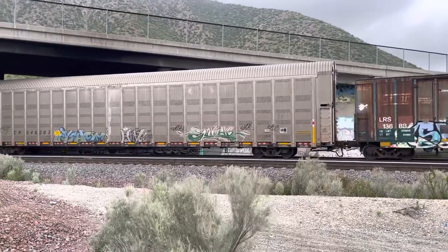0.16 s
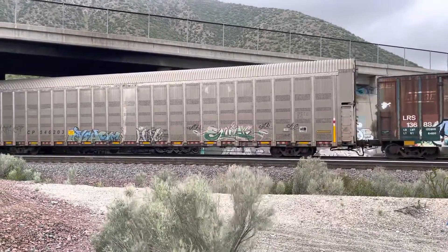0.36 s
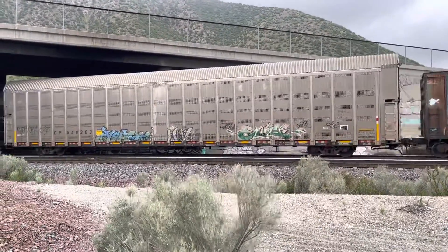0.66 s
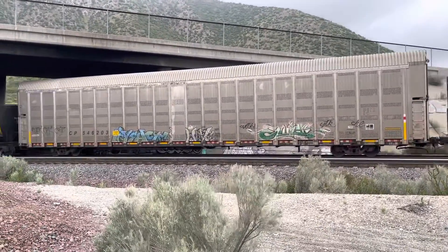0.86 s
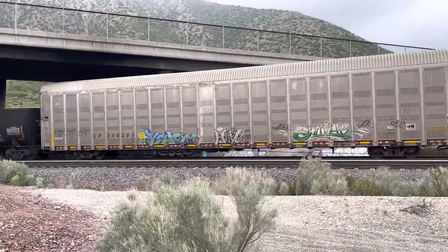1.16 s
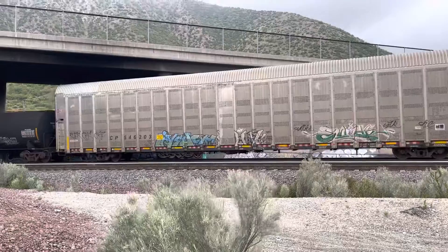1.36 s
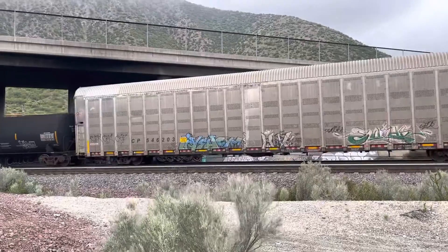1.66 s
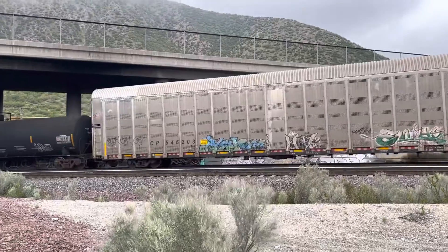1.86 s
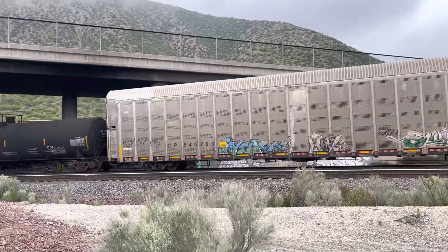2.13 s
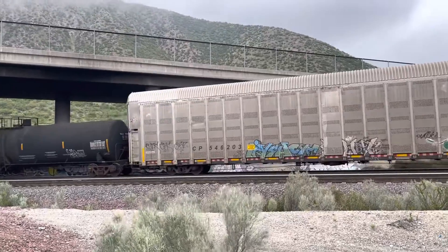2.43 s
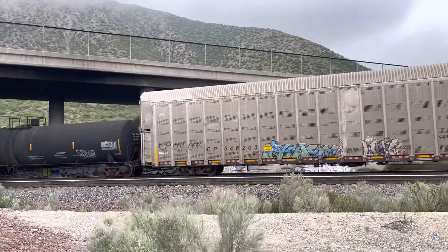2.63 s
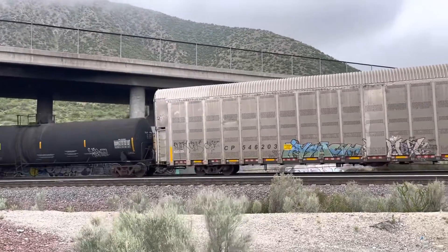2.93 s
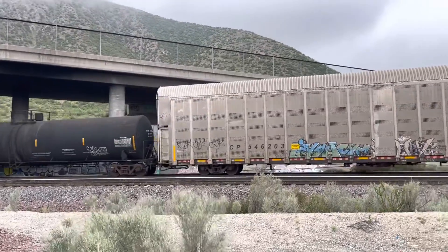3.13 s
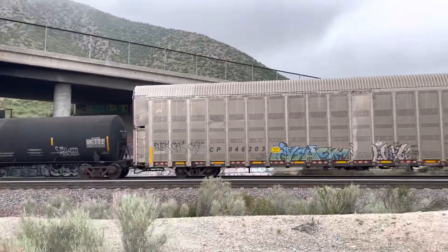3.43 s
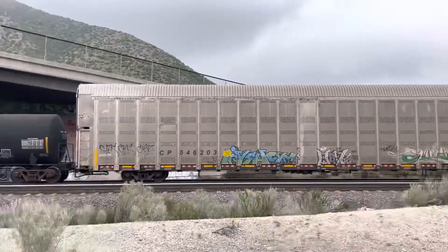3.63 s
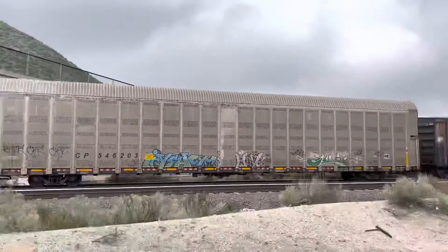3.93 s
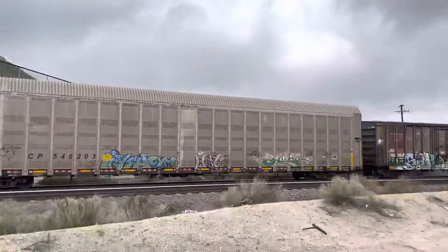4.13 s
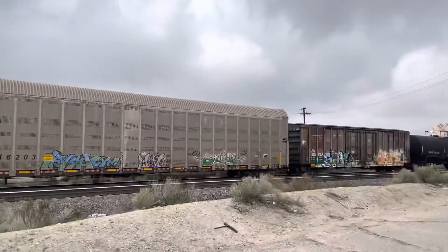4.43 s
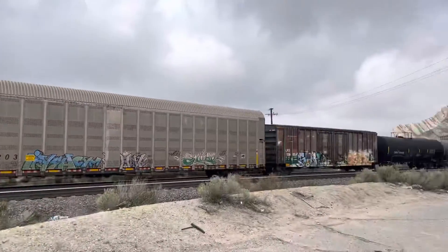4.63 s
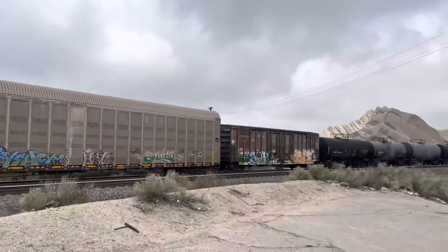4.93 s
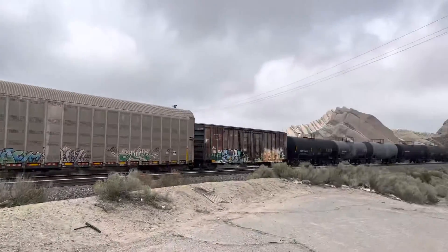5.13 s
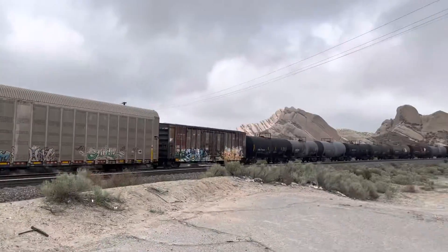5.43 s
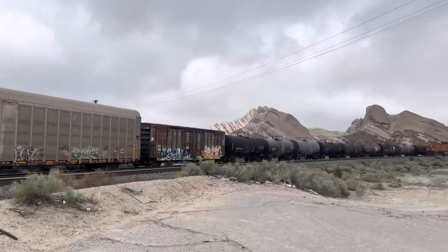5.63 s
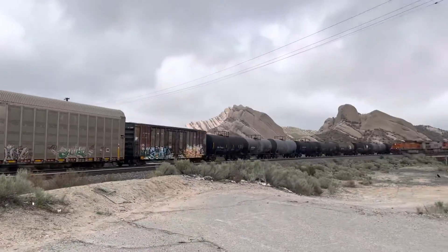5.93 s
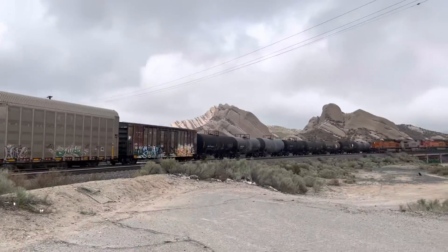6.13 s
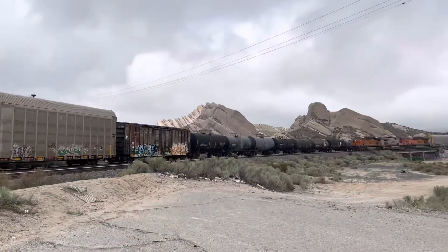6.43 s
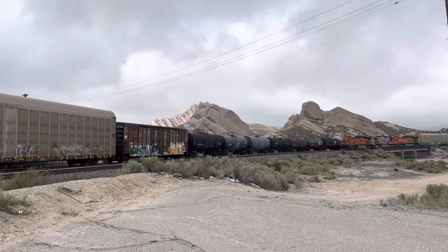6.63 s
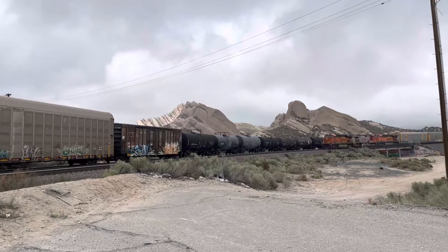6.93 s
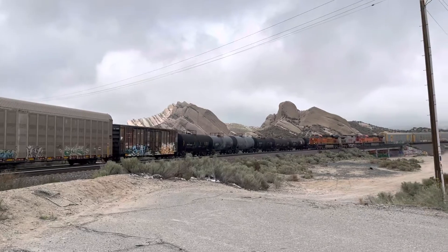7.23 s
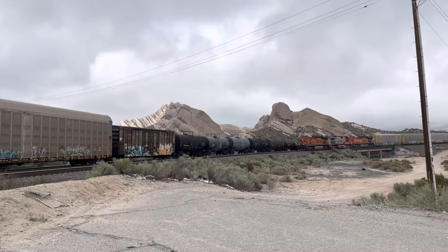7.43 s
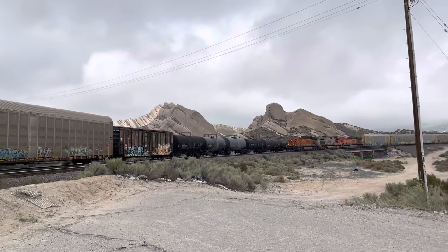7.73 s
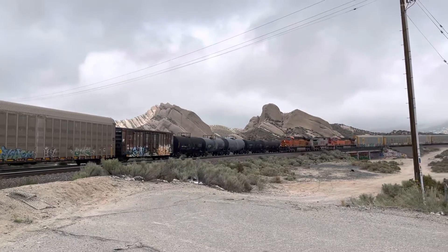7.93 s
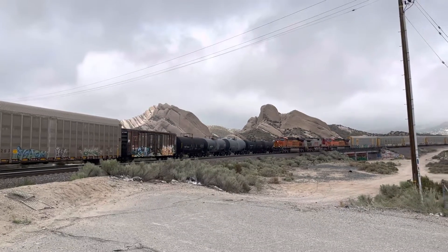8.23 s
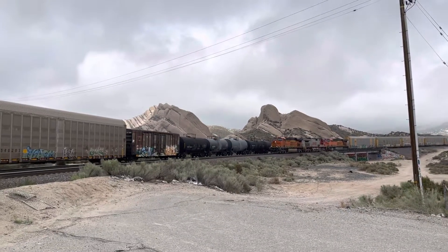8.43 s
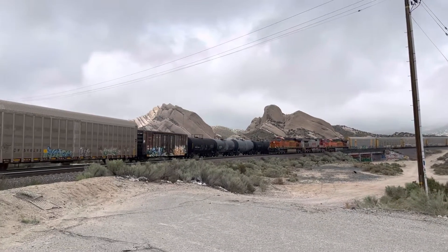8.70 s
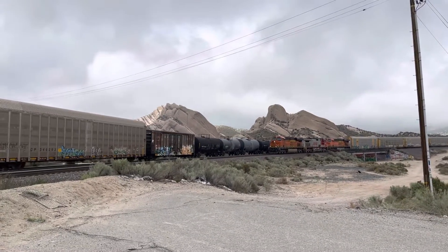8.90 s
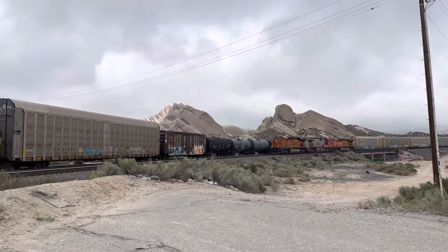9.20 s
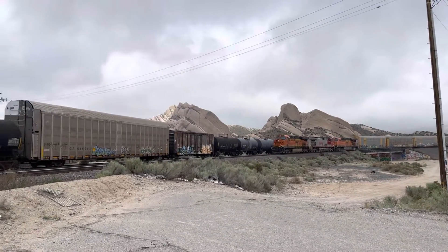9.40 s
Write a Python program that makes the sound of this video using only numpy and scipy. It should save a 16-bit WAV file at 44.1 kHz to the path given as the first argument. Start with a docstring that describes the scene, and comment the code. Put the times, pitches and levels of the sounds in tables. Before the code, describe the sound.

Outdoors beside railway tracks, heavy cars roll by with low boom and roar while steel wheels screech a wavering, echoing high-pitched squeal throughout.

```python
"""Open ground beside a railway curve, where a freight train rolls slowly by with a rumble and a roar,
made of shaped noise. Wheels stick and slip and squeal in single modes: pure tones ringed by
Doppler-shifted echoes off the moving cars. Flanges hiss as noise, ring in rim modes and whistle.
Knocks are noise thuds with decaying sines, dry ticks are noise bursts, and rubs and squeaks
are narrow noise at a gliding pitch."""
import sys
import numpy as np
from scipy import signal
from scipy.fft import rfft, irfft, next_fast_len
from scipy.io import wavfile
from scipy.ndimage import uniform_filter1d, map_coordinates

SR = 44100
rng = np.random.default_rng(int(sys.argv[2]) if len(sys.argv) > 2 else 0)


def generate_wav(signal):
    """Clip the signal to [-1, 1] and save it as 16-bit WAV at the path in sys.argv[1]."""
    frames = np.transpose(np.atleast_2d(signal))
    scaled = np.clip(frames, -1, 1) * 32767
    pcm = np.round(scaled).astype(np.int16)
    wavfile.write(sys.argv[1], SR, pcm)


N = 421596


def amp(db):
    """A level in decibels is 20 times the logarithm of the amplitude ratio returned here."""
    return 10 ** (np.asarray(db) / 20)


def unit(x):
    """Normalisation: the mean power becomes 1, so a later gain alone sets the level."""
    return x / np.sqrt(np.mean(np.abs(x) ** 2) + 1e-20)


def clock():
    """Sampling: the time of each sample in seconds."""
    return np.arange(N) / SR


def along(points, hz):
    """Logarithmic frequency scale: (Hz, value) points are joined by straight lines on it."""
    f, v = np.transpose(points)
    return np.interp(np.log(hz + 1), np.log(f + 1), v)


def curves(rows):
    """Linear interpolation: one value per sample for each column after the time."""
    s, *cols = np.transpose(rows)
    return [np.interp(clock(), s, c) for c in cols]


def passage(rows):
    """Envelope: gain from (s, dB) rows, falling at 150 dB a second outside their span."""
    t = clock()
    outside = np.maximum(0, np.maximum(rows[0][0] - t, t - rows[-1][0]))
    return amp(curves(rows)[0] - 150 * outside)


def humps(rows):
    """Cosine-squared window: a smooth hump for each (centre s, reach s to either side, height) row."""
    t, out = clock(), np.zeros(N)
    for s, reach, height in rows:
        near = slice(*np.searchsorted(t, [s - reach, s + reach]))
        out[near] += height * np.cos(np.pi / 2 * (t[near] - s) / reach) ** 2
    return out


def swells(rows):
    """Envelope: gain of (centre s, reach s, peak dB) events that swell and fade."""
    return humps([(s, reach, amp(db)) for s, reach, db in rows])


def wobble(rate):
    """Slow random modulation: a smooth curve through random knots, rate of them a second."""
    coarse = np.linspace(0, N, N // 32)
    knots = rng.standard_normal(int(N * rate / SR) + 4)
    smooth = map_coordinates(knots, [coarse * rate / SR])
    return np.interp(np.arange(N), coarse, smooth)


def filtered(x, response):
    """Linear filtering: the spectrum is multiplied by a complex response of frequency."""
    size = next_fast_len(N + 8192)
    return irfft(rfft(x, size) * response(np.fft.rfftfreq(size, 1 / SR)), size)[..., :N]


def rush(colour):
    """Coloured noise of rms 1: a shared and an opposed part set the coherence of the two ports."""
    # Likeness of the two microphone ports. Each row: frequency in Hz, likeness from 0 to 1.
    likeness = [(35, 0.99), (60, 0.99), (130, 0.92), (280, 0.81), (590, 0.39), (1300, 0.042), (2600, 0.66),
                (5200, 0.54), (7500, 0.64), (8600, 1), (12000, 1)]
    size = next_fast_len(N + 8192)
    hz = np.fft.rfftfreq(size, 1 / SR)
    # a gentle extra rolloff continues past the last point of the spectrum
    gain = amp(along(colour, hz)) / (1 + (hz / (2 * colour[-1][0])) ** 2)
    alike = np.clip(along(likeness, hz), -1, 1)
    white = rng.standard_normal((2, 2 * len(hz)), dtype=np.float32).view(np.complex64)
    shares = (gain * np.sqrt([1 + alike, 1 - alike])).astype(np.float32)
    mid, side = irfft(white * shares, size)[:, :N] * size
    return unit(np.array([mid + side, mid - side]))


def steady(x):
    """Level compression: dividing by the quarter-second rms leaves only the quick throb."""
    power = np.abs(uniform_filter1d(np.mean(x ** 2, axis=0), size=SR // 4))
    return unit(x / np.sqrt(power + 1e-3))


def facing(across, down_line):
    """Directional colour: equal-power mixing as the listener turns to a grazing angle."""
    # The listener turns to look down the line. Each row: time in seconds, turn from 0 to 1.
    turning = [(0, 0), (3.3, 0.03), (4.5, 0.62), (6, 0.97), (9.56, 1)]
    turn = np.clip(curves(turning)[0], 0, 1)
    return np.sqrt(1 - turn) * rush(across) + np.sqrt(turn) * rush(down_line)


def scatter(width_hz, drop_hz, steep, apart):
    """Doppler spreading: many echoes, each with its own shift, make a complex fading at both ports."""
    step = 16  # samples between computed points
    count = next_fast_len(N // step + 2)
    shift = np.fft.fftfreq(count, step / SR)
    shape = 1 / np.sqrt(1 + np.abs((shift + drop_hz) / width_hz) ** steep)
    lines = rng.standard_normal((2, count)) + 1j * rng.standard_normal((2, count))
    mid, side = np.fft.ifft(lines * shape)
    slow = unit(np.array([mid + apart * side, mid - apart * side])).astype(np.complex64)
    ramp = np.arange(step, dtype=np.float32) / step
    return (slow[:, :-1, None] + np.diff(slow)[..., None] * ramp).reshape(2, -1)[:, :N]


def spin(pitch):
    """Phase is the integral of frequency: a unit phasor that follows a pitch in Hz."""
    phase = (2 * np.pi * (np.cumsum(pitch * np.ones(N)) / SR % 1)).astype(np.float32)
    return np.cos(phase) + 1j * np.sin(phase)


def panned(x, db):
    """Interaural level difference: the left is made louder than the right by db."""
    return x * amp(np.array([db, -db]) / 2).reshape(2, -1)


def rolling():
    """Roughness excitation: heavy cars boom on springs, their sides drum, and rails roar and hiss."""
    # Boom as heavy cars come near. Each row: time in seconds, relative level in dB.
    boom_level = [(0, -37), (.23, -38), (.275, -32), (.33, -41), (.71, -39), (.755, -24.5), (3.8, -22.5),
                  (8.4, -20.5), (8.55, -25), (9.56, -23)]
    # A car lurches louder or settles softer. Each row: centre in seconds, change in dB.
    lurches = [(1.42, 5), (1.79, -4), (1.98, 8.5), (2.33, -4), (2.591, 5), (3.07, -3.5), (3.85, 3),
               (5.5, 4.5), (6.09, 3), (6.3, -2), (6.5, -7), (6.68, 4.5), (7.3, 2), (7.52, 3), (7.66, -3.5),
               (8.03, 5), (8.58, -8), (8.73, 3), (8.92, -8), (9.08, 2)]
    lurch_reach_s = 0.088
    # Car sides drumming near 100 Hz. Each row: time in seconds, relative level in dB.
    drum_level = [(0.0, -44), (0.24, -32), (0.48, -40), (0.92, -32), (3.08, -22.5), (3.32, -37),
                  (4.16, -25.5), (4.4, -38), (5.48, -23), (6.6, -34), (7.08, -25), (7.6, -33), (8.2, -28),
                  (8.5, -37), (9.08, -43), (9.56, -31)]
    # Rolling noise. Each row: time in seconds, then relative levels in dB of car bodies, rails and hiss.
    roll = [(0.0, -42, -41, -50.5), (0.24, -37, -40, -48), (0.64, -37.5, -38.5, -49.5),
            (1.04, -29.5, -37.5, -49.5), (2.52, -30.5, -38, -48), (3.32, -28.5, -35.5, -46.5),
            (4.32, -29, -37.5, -49), (5.24, -29.5, -37, -49.5), (5.6, -29.5, -39, -49),
            (5.92, -29.5, -39, -51.5), (8.12, -29.0, -37.5, -51.0), (8.48, -32.5, -43, -58),
            (9.56, -31.5, -37.5, -54)]
    # Spectra, some across the track and some down the line. Each row: frequency in Hz, density in dB per Hz.
    rumble_colour = [(15, -45), (30, -25), (45, -14), (58, 0.5), (70, -5.5), (85, -9), (105, -18.5),
                     (160, -44)]
    drum_colour = [(70, -39), (90, -5), (99, 8.5), (110, -5), (130, -23), (170, -35)]
    body_colour = [(70, -41), (120, -0.5), (170, -0.5), (260, -2), (310, -4), (390, -7), (460, -10.5),
                   (600, -21), (1200, -48)]
    body_far_colour = [(70, -17), (120, 2), (160, -1), (230, -4), (300, -9.5), (345, -5), (430, -17),
                       (600, -28), (1200, -45.5)]
    rail_colour = [(200, -11), (450, 3), (620, 1.5), (800, 4.5), (1000, 2.5), (1350, -1.5), (2200, -5.5),
                   (2900, -10.5), (4500, -22)]
    rail_far_colour = [(200, -11), (450, 0), (620, 1.5), (780, -1.5), (920, -4.5), (1030, 0), (1250, -1.5),
                       (1420, -4), (2200, -5.5), (2900, -15), (4500, -60)]
    hiss_colour = [(2000, -13), (3200, 7.5), (4700, 5), (5300, 7), (6000, 3), (7200, 0), (8600, 1.5),
                   (9700, 1.5), (11000, 5), (13000, -71)]

    body_db, rail_db, hiss_db = curves(roll)
    lurch_db = humps([(s, lurch_reach_s, db) for s, db in lurches])
    boom_gain = passage(boom_level) * amp(0.4 + lurch_db + 0.68 * wobble(14))
    boom = boom_gain * steady(rush(rumble_colour))
    drum = passage(drum_level) * amp(-2.0) * steady(rush(drum_colour))
    body = amp(body_db + 0.6 + 0.56 * wobble(12)) * facing(body_colour, body_far_colour)
    # down the line the bounce off the ground hollows the roar below 1 kHz
    rails = amp(rail_db + 2.0 + 0.89 * wobble(14)) * facing(rail_colour, rail_far_colour)
    hiss = amp(hiss_db + 3.0 + 1.56 * wobble(70)) * rush(hiss_colour)
    return boom + drum + panned(body, db=0.5) + panned(rails, db=2.0) + panned(hiss, db=2.5)


def wheel_squeal():
    """Stick-slip locks one wheel mode into a pure tone; echoes flutter it, hard slip adds overtones."""
    # How hard the main wheel squeals. Each row: time in seconds, effort in dB.
    effort = [(0.0, -38), (0.36, -35), (0.6, -48), (0.88, -33.5), (1.04, -46), (2.6, -29), (2.76, -34),
              (3.28, -24.5), (4.72, -33.5), (5.24, -24.5), (5.48, -33.5), (6.48, -30.5), (7.12, -24),
              (7.52, -29.5), (8.24, -23.5), (8.64, -22.5), (8.76, -30), (9.56, -24.5)]
    usual_db = -30  # effort at which the relative levels below hold
    # Its pitch sinks as it rolls away. Each row: time in seconds, pitch in Hz.
    wheel_pitch = [(0, 2659), (.2, 2652), (.38, 2661), (.9, 2659), (1.62, 2648), (1.88, 2659), (2.1, 2653),
                   (3, 2664), (5.3, 2662), (6, 2656), (7.05, 2658), (7.25, 2652), (7.45, 2656), (7.7, 2641),
                   (8.1, 2650), (8.3, 2650), (8.9, 2640), (9.15, 2644), (9.33, 2633), (9.56, 2629)]
    # The wheel bites and its pure tone surges. Each row: centre in seconds, extra level in dB.
    surges = [(.33, 4.5), (1.47, 6.5), (1.75, 4), (1.88, 10), (2.1, 0.5), (2.19, 4.5), (2.57, 2), (2.91, 6),
              (3.02, 6), (3.3, 3.5), (3.46, 2.5), (3.79, 3), (3.92, 8), (4.31, 5.5), (4.89, 8), (5.16, 3),
              (5.3, 2), (5.7, 5), (5.95, 7.5), (6.38, 2.5), (6.83, 2.5), (7.12, 4.5), (7.27, 3),
              (7.82, 4.5), (7.95, 5), (8.15, 6), (8.31, 7), (8.6, 3.5), (8.89, 7.5), (9.13, 4), (9.35, 5),
              (9.48, 6)]
    # The wheel grips and the squeal falters.
    # Each row: centre in seconds, reach in seconds, depth in dB (negative lifts).
    grips = [(.125, 0.049, 13), (.93, 0.048, 8), (1.05, 0.041, 9), (1.35, .035, 7), (1.81, 0.076, 6),
             (1.96, 0.077, 12), (2.245, .025, 18), (2.39, 0.037, 7), (2.965, 0.023, 13), (3.255, 0.031, 10),
             (3.51, 0.018, 18), (3.66, .03, 9), (3.745, 0.014, 5), (3.955, 0.018, 15), (4.22, 0.014, 7),
             (4.38, .016, 10), (4.51, 0.016, 15), (4.6, 0.013, -4), (4.655, 0.014, 15), (4.76, 0.037, 12),
             (4.853, 0.014, 18), (5.415, 0.0099, 6), (5.57, .04, 15), (5.805, 0.015, 18),
             (5.865, 0.041, 11), (6.13, 0.036, 30), (6.325, 0.035, 10), (6.49, 0.054, 4),
             (6.678, 0.019, 16), (7.34, 0.055, 9), (7.535, 0.019, 12), (7.61, 0.0097, 22),
             (7.768, 0.023, 13), (7.9, 0.059, 5.5), (7.988, 0.0092, 13), (8.19, 0.015, 17),
             (8.41, 0.037, 6.5), (8.725, 0.018, 12), (9.045, 0.011, 18), (9.225, 0.056, 6.5),
             (9.298, 0.027, 21), (9.43, 0.01, 12), (9.518, 0.014, 21)]
    surge_reach_s, grip_echo_share = 0.064, 0.42  # the share of a grip's depth that dips the echoes
    # relative levels in dB, and the dB each gains for each dB of effort
    direct_db, direct_grows = -25.5, 1.06
    partner_db, partner_grows = -35.5, 0.26
    overtone_db, overtone_grows = -63, 0.14
    lock_grows = 1  # dB of flutter lost for each dB of squeal
    # The partner wheel sags and drifts back. Each row: time in seconds, Hz below the main wheel.
    partner_sag = [(0, 16), (.25, 25), (.42, 52), (.6, 30), (.9, 20), (1.12, 42), (1.33, 18), (1.5, 22),
                   (2.4, 32), (4.5, 42), (6.5, 25), (9.56, 20)]
    # Echoes off the cars, strongest as a tall flat-sided one passes.
    # Each row: time in seconds, relative level in dB.
    echo_level = [(0, -37.5), (.4, -33.5), (1.05, -38.5), (2.7, -32), (3.55, -28), (4.7, -28), (5.5, -31.5),
                  (6.3, -34.5), (6.8, -30.5), (8.15, -28.5), (8.5, -37), (8.8, -32), (9.56, -29.5)]
    # Second harmonic, which the fourth follows. Each row: time in seconds, relative level in dB.
    even_overtones = [(0, -61), (2.3, -55), (2.65, -48), (2.95, -52), (3.35, -47.5), (4.1, -55),
                      (4.75, -48), (5.05, -56), (5.55, -53), (6.05, -66), (6.45, -54), (7.5, -56),
                      (8.25, -51), (8.5, -56.5), (8.75, -55.5), (9.56, -52.5)]
    fourth_db = -3  # relative to the second
    # Doppler spread in Hz of the second, third and fourth harmonic.
    overtone_spread_hz = [135, 80, 110]
    # The wheel slips hard and turns shrill.
    # Each row: centre in seconds, reach in seconds, relative overtone level in dB.
    shrills = [(4.75, 0.27, -61), (6.75, 0.32, -72), (8.15, 0.18, -62), (9.15, 0.21, -52), (9.5, 0.13, -50)]
    # The squeal shifts between the ports as wheel and listener move.
    # Each row: time in seconds, left over right in dB, extra phase lead of left in radians.
    bearing = [(0, 1, -0.29), (.9, 3, -.15), (1.3, 5.5, -0.51), (2.6, 6, -0.8), (3.3, 2, -0.49),
               (4, 1, 0.42), (5.1, -3, 0.37), (5.75, 2.5, -0.54), (6.2, -1.5, -0.2), (7.8, -1, 0.059),
               (8.5, -2, 0.44), (9.56, 0.5, 0.85)]

    effort_db = curves(effort)[0] - usual_db
    surge_db = humps([(s, surge_reach_s, db) for s, db in surges])
    grip_db = humps(grips)
    # the harder the wheel squeals, the firmer it locks and the less its tone flutters
    loose = np.minimum(amp(-lock_grows * (effort_db + surge_db)), 1.3)
    tone = spin(curves(wheel_pitch)[0] + (1.3 + 3.0 * loose) * wobble(14))
    fading = 1 + 0.17 * scatter(width_hz=35, drop_hz=1.4, steep=6.2, apart=0.5)
    flutter = amp(1.57 * loose * wobble(24)) * fading
    direct = amp(direct_db + direct_grows * effort_db + surge_db - grip_db) * flutter

    # the other wheel on the axle sings a little lower and beats with it
    partner_gain = amp(partner_db + partner_grows * effort_db - grip_db + 0.69 * wobble(4.5))
    partner = partner_gain * spin(5 * wobble(7) - curves(partner_sag)[0])

    # most echoes come off receding cars and lie below the pitch; the train's speed bounds their spread
    echo = passage(echo_level) * amp(2.5 - grip_echo_share * grip_db)
    near = scatter(width_hz=41.6, drop_hz=26.4, steep=5.1, apart=0.47)
    wide = 0.54 * scatter(width_hz=99, drop_hz=0, steep=13, apart=0.5)
    left_db, lead = curves(bearing)
    port_phase = np.exp(.5j * np.array([lead, -lead], dtype=np.float32))
    voice = (direct + partner + echo * (near + wide)) * tone * port_phase

    # harder slip distorts the wheel's swing into harmonics, heard as a haze of echoes
    odd_gain = amp(overtone_db + overtone_grows * effort_db - usual_db + 3.3 * wobble(7))
    odd = odd_gain * echo + swells(shrills)
    even = passage(even_overtones) * amp(1.2 * wobble(9) - grip_echo_share * grip_db)
    levels = [even, amp(2.0) * odd, amp(fourth_db) * even]
    for order, (level, width_hz) in enumerate(zip(levels, overtone_spread_hz), 2):
        haze = scatter(width_hz=width_hz, drop_hz=13 * order, steep=4, apart=0.37)
        voice = voice + level * tone ** order * haze
    return panned(voice.real, left_db)


def flanges():
    """Friction-driven resonance: grinding flanges hiss, and rim modes ring harder with the grind."""
    # Flanges grind and recede. Each row: time in seconds, relative level in dB.
    grind_level = [(0, -45.5), (.9, -41.5), (1.2, -37), (2.2, -43), (3, -46.5), (3.8, -46.5), (4.4, -66),
                   (9.56, -71)]
    # Single scrapes. Each row: centre in seconds, reach in seconds, relative level in dB.
    scrapes = [(4.0, 0.21, -44), (4.32, 0.14, -47), (4.76, 0.19, -49.5), (5.21, 0.21, -45.5),
               (6.7, 1.0, -66), (9.4, 0.38, -71)]
    # Rim modes. Each row: frequency in Hz, relative level in dB.
    rim = [(6670, -64), (7634, -59), (8080, -61), (8672, -56), (8720, -60), (9119, -60), (10826, -56),
           (11122, -53), (11676, -59), (11714, -56)]
    # Grinding spectrum. Each row: frequency in Hz, density in dB per Hz.
    flange_colour = [(5000, -15), (7400, -10), (7800, -2.5), (8700, -5.5), (9500, 4), (10300, 9.5),
                     (11200, 4), (11700, -1), (12200, -2), (12550, -16), (12800, -12), (13000, -32)]
    usual_db, rim_db, rim_grows = -42, -47, 1.2  # rim level at the usual grind, and dB gained per dB

    grind_db, = curves(grind_level)
    grind_gain = (amp(grind_db) + swells(scrapes)) * amp(2.5 + 2.0 * wobble(25.12))
    grind = grind_gain * rush(flange_colour)
    # each rim mode is caught and let go on its own, and echoes blur them all
    modes = sum(amp(db) * np.abs(1 + 0.53 * wobble(12)) * spin(hz + 11 * wobble(30)).real
                for hz, db in rim)
    blur = 1 + 0.5 * scatter(width_hz=55, drop_hz=0, steep=2.7, apart=.4).real
    return grind + amp(rim_db + rim_grows * (grind_db - usual_db)) * unit(modes) * blur


def whistles():
    """Direct and scattered sound: a near flange sends tone, echoes and a neighbour mode; far ones echoes."""
    # A near flange whistles very high. Each row: time in seconds, relative level in dB.
    near_level = [(0.0, -38), (0.12, -34), (0.97, -40), (1.21, -34), (1.45, -40.5), (3.26, -45),
                  (4.03, -55), (4.15, -73)]
    # Flanges farther off. Each row: centre in seconds, reach in seconds, relative level in dB.
    far_level = [(6.9, 1.2, -60.5), (9.33, 0.33, -53)]
    near_hz, start_hz, neighbour_hz, far_hz = 12308, 12385, 12446, 12490
    settle_s = 0.35  # time constant of the fall from start_hz

    pitch = near_hz + (start_hz - near_hz) * np.exp(-clock() / settle_s)
    direct = 0.49 * amp(2.9 * wobble(20.96))
    echoes = 0.41 * scatter(width_hz=22, drop_hz=-6, steep=2.5, apart=0.24)
    tone = spin(pitch) * (direct + echoes)
    neighbour = .38 * spin(neighbour_hz) * scatter(width_hz=10, drop_hz=0, steep=2.4, apart=.5)
    near = passage(near_level) * amp(7.5 + 1.1 * wobble(7.1)) * (tone + neighbour)
    far = swells(far_level) * spin(far_hz) * scatter(width_hz=35, drop_hz=0, steep=3, apart=0.46)
    return np.real(near + far)


def rubs():
    """Resonance bandwidth: rubbing steel squeaks or groans in narrow gliding bands and rasps in wide ones."""
    # Brief rubs. Each row: centre in seconds, reach in seconds, pitch in Hz, glide in Hz per second,
    # width in Hz, relative level in dB.
    rub_rows = [(0.301, 0.62, 1920, 0, 150, -49.5), (.7, 1.3, 1032, 0, 118.8, -48.5),
                (1.56, 0.14, 6035, 0, 18, -54), (1.8, .8, 2513, -2, 35, -50),
                (3.31, .07, 2200, -400, 25, -46), (4.17, 0.038, 2130, 0, 22, -44),
                (4.673, 0.04, 2120, 500, 25, -43), (4.76, .13, 2160, 0, 194.4, -47),
                (4.735, 0.07, 642, 0, 140, -39.5), (4.785, .09, 903, 800, 260, -41.5),
                (5.075, .12, 1460, 200, 55, -40), (5.16, .32, 1547, -100, 130, -42),
                (5.265, .07, 1580, -300, 56, -41), (5.305, .1, 1390, -800, 240.7, -39),
                (5.12, 0.29, 882, 0, 150, -45), (6.866, 0.045, 2140, -500, 28, -44),
                (7.3, 1.7, 1025, 0, 30, -50), (9.297, .55, 1422, -2, 270, -46.5)]
    t, out = clock(), np.zeros((2, N))
    for s, reach, hz, glide, width_hz, db in rub_rows:
        near = np.abs(t - s) < reach
        age = t[near] - s
        lowpass = signal.butter(2, width_hz, fs=SR, output="sos")
        white = rng.standard_normal((2, 2 * len(age))).view(complex)
        mid, side = signal.sosfilt(lowpass, white)
        carrier = np.exp(2j * np.pi * (hz + glide * age / 2) * age)
        rasp = np.array([mid + .6 * side, mid - 0.43 * side]) * carrier
        out[:, near] += amp(db + 4.5) * unit(rasp.real) * np.cos(np.pi / 2 * age / reach) ** 2
    return out


def hits(rows, colour, t60, attack):
    """Heavily damped impact: noise bursts that fall 60 dB in t60 seconds."""
    t, envelope = np.arange(SR // 4) / SR, np.zeros(N + SR)
    for s, db in rows:
        envelope[round(s * SR):][:len(t)] += amp(db - 60 * t / t60) * (1 - np.exp(-t / attack))
    return envelope[:N] * rush(colour)


def knocks():
    """Impulse response: slack runs in, and each blow gives a dull thud and a short ring of the struck part."""
    # Couplers and running gear clunk.
    # Each row: start in seconds, relative thud level in dB, ring pitch in Hz, ring level in dB.
    blows = [(0.152, -25, 110, -25), (0.204, -25, 278, -22.5), (0.242, -20, 290, -25),
             (0.261, -18, 161, -21), (0.28, -25, 125, -16), (0.406, -24, 400, -22.5),
             (0.462, -27, 340, -29), (0.479, -20, 330, -21), (0.512, -24, 190, -24), (4.735, -28, 600, -25),
             (4.782, -28, 750, -20.5)]
    # Thud spectrum. Each row: frequency in Hz, density in dB per Hz.
    knock_colour = [(50, -27), (130, 1), (380, -4), (700, -18), (2000, -27), (5000, -52)]
    ring_s = 0.061  # time to fall 60 dB
    t, rings = np.arange(SR // 4) / SR, np.zeros(N + SR)
    for s, _, hz, db in blows:
        decay = amp(db - 60 * t / ring_s) * (1 - np.exp(-t / .002))
        rings[round(s * SR):][:len(t)] += decay * np.sin(2 * np.pi * hz * t)
    thuds = hits([row[:2] for row in blows], knock_colour, t60=0.073, attack=0.003)
    return rings[:N] + amp(-2.5) * thuds


def ticks():
    """Short steel contacts excite high bands: a clink and a brighter snap, with fine crackle between."""
    # Dry ticks. Each row: start in seconds, relative clink level in dB, relative snap level in dB.
    contacts = [(1.107, -46, -33), (1.4217, -43, -36), (3.0076, -43, -37), (3.1094, -45, -37),
                (3.2056, -42, -33.5), (3.7998, -43, -36.5), (4.2023, -44, -37), (4.6084, -39, -39),
                (4.9062, -42, -41), (5.256, -38, -48), (5.3073, -43, -35.5), (5.46, -40, -44),
                (5.5094, -41, -40), (5.5583, -35, -50), (5.6087, -45, -41), (5.657, -37, -41),
                (5.7014, -39, -38.5), (5.7344, -43, -43), (5.8194, -45, -43), (5.9399, -49, -44),
                (6.2103, -43, -36), (6.3026, -40, -41), (6.5071, -50, -42), (6.5325, -39, -34),
                (6.6114, -43, -40), (7.01, -48, -40), (7.1097, -40, -44), (7.33, -48, -42),
                (7.7184, -46, -39.5), (7.8077, -47, -38.5), (8.0356, -51, -41.5)]
    # Snap, clink and crackle spectra. Each row: frequency in Hz, density in dB per Hz.
    snap_colour = [(3000, -25), (5500, -7), (6800, 5), (8700, 7), (10000, 8.5), (12500, -25)]
    clink_colour = [(2500, -25), (4000, -4), (5000, 5), (5700, -1), (7500, -15), (10000, -35)]
    crackle_colour = [(2500, -20), (4500, -2), (9000, 1), (12000, -26)]
    crackle_s, crackle_spread_s, crackle_db, crackle_count = 5.6, 0.23, -43.5, 26

    s, clink_db, snap_db = np.transpose(contacts)
    clinks = hits(zip(s, clink_db), clink_colour, t60=0.062, attack=0.0025)
    snaps = hits(zip(s, snap_db), snap_colour, t60=0.058, attack=0.0011)
    when, size = rng.standard_normal((crackle_count, 2)).T
    starts = np.clip(crackle_s + crackle_spread_s * when, 0, N / SR)
    grains = zip(starts, crackle_db + 2.5 * size)
    return amp(1) * (clinks + snaps) + hits(grains, crackle_colour, t60=0.017, attack=0.0004)


def axle_squeal():
    """Beating: two nearly equal wheels take turns to sing, and interfere among their echoes."""
    # A second axle squeals higher.
    # Each row: time in seconds, then relative levels in dB of lower wheel, higher wheel and echoes.
    axle = [(1.359, -60, -59, -64), (1.48, -58, -50.5, -55), (2.1, -53, -52, -50), (2.4, -45, -45, -48),
            (2.74, -53, -54, -38.5), (2.81, -43, -34, -39), (2.89, -38, -36, -38), (2.96, -33, -44, -38),
            (3.05, -51, -53, -40), (3.13, -46, -48, -36), (3.22, -32, -42, -41), (3.28, -38, -39, -37),
            (3.37, -28.5, -41, -36), (3.46, -37, -43, -37), (3.54, -32.5, -45, -39),
            (3.63, -46, -39.5, -41), (3.9, -48, -46, -52), (4.08, -59, -64, -62)]
    # Pitch bends with the load. Each row: time in seconds, lower wheel in Hz, higher wheel in Hz.
    axle_pitch = [(1.5, 3552, 3602), (1.6, 3548, 3577), (2.8, 3546, 3577), (2.98, 3545, 3560),
                  (3.2, 3539, 3570), (3.4, 3543, 3570), (3.6, 3538, 3565), (3.9, 3541, 3570),
                  (4.1, 3532, 3566)]
    s, low_db, high_db, echo_db = np.transpose(axle)
    low_hz, high_hz = curves(axle_pitch)
    low, high = [passage(np.c_[s, db]) * amp(1.2 * wobble(20)) * spin(hz + 3.46 * wobble(14))
                 for db, hz in [(low_db, low_hz), (high_db, high_hz)]]
    fading = scatter(width_hz=80, drop_hz=8, steep=6.1, apart=0.33)
    echoes = passage(np.c_[s, echo_db]) * spin(low_hz) * fading
    return panned(amp(2.0) * np.real(low + high + echoes), db=2.0)


def brief_squeal():
    """Stick-slip caught for a moment: a farther wheel sings one thin, wavering tone."""
    # The squeal, a little above the main one. Each row: centre in seconds, reach in seconds, level in dB.
    catch = [(6.72, .33, -46)]
    squeal_hz = 2872
    waver = 1 + .5 * scatter(width_hz=10, drop_hz=0, steep=4, apart=.6)
    return np.real(swells(catch) * spin(squeal_hz) * waver)


def scene():
    """Superposition: the sounds of the whole train add at the two ports."""
    running = rolling() + rubs() + knocks() + ticks()
    squeals = wheel_squeal() + axle_squeal() + brief_squeal()
    return running + squeals + flanges() + whistles()


def record(dry):
    """Interchannel phase: the ports differ most in the treble, and nothing passes above the band limit."""
    # Phase between the two microphone ports. Each row: frequency in Hz, lead of left in radians.
    port_lead = [(100, 0), (300, .15), (520, .85), (850, .95), (1100, -.6), (1500, -1.2), (2000, -.2),
                 (2650, .6), (3200, .95), (4300, .3), (5200, .8), (6600, 0), (7700, .9), (8300, 0),
                 (8900, -.1), (9300, -1.7), (10200, -3.14), (10900, -4.2), (11700, -6.2), (12500, -6.9)]
    top_hz = 12985

    def response(hz):
        """Half the phase lead goes to each port, with opposite signs."""
        return np.exp(.5j * along(port_lead, hz) * np.array([[1], [-1]])) * (hz < top_hz)

    return filtered(dry, response)


dry = scene()
out = record(dry)
generate_wav(out)
```